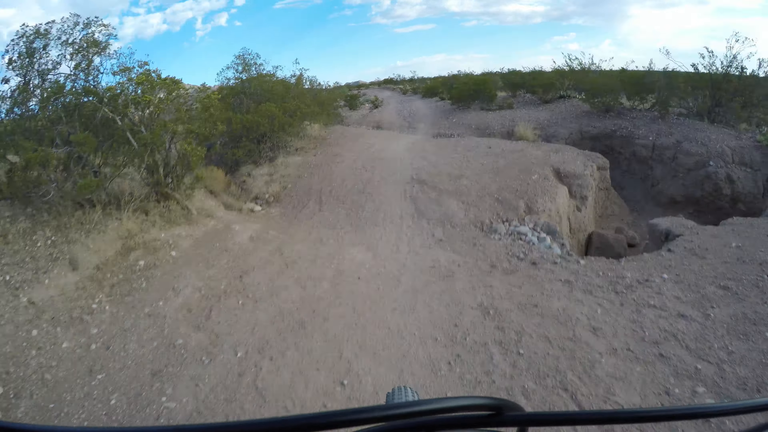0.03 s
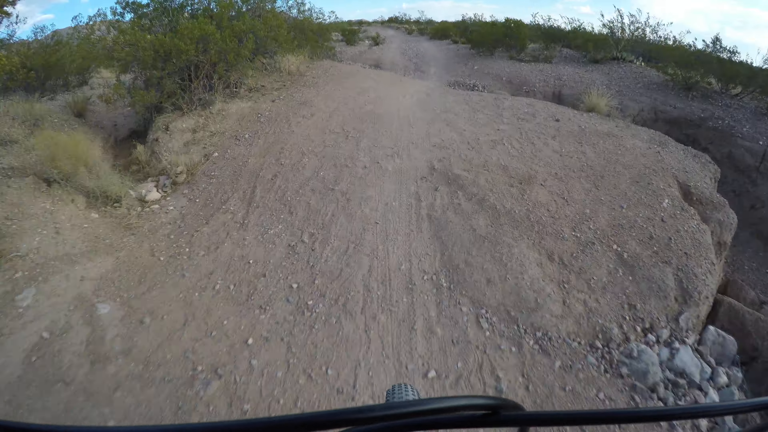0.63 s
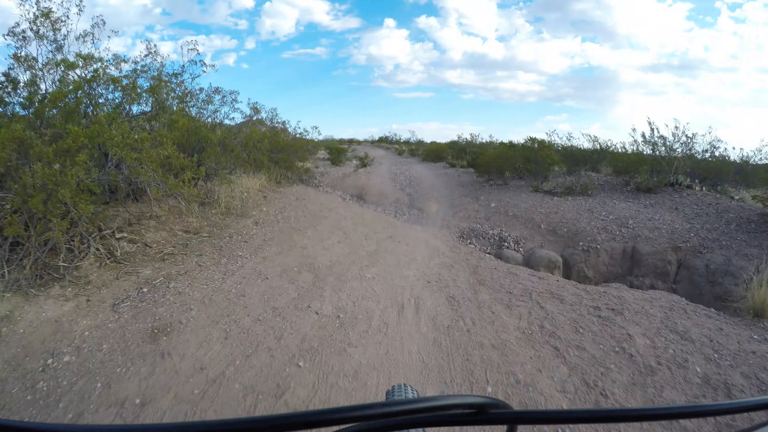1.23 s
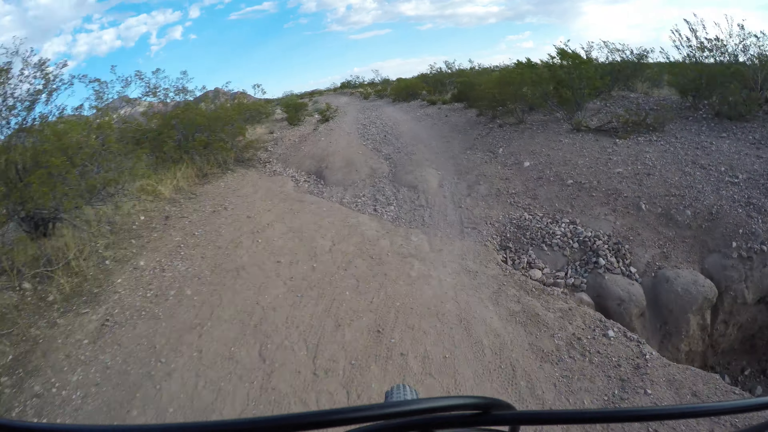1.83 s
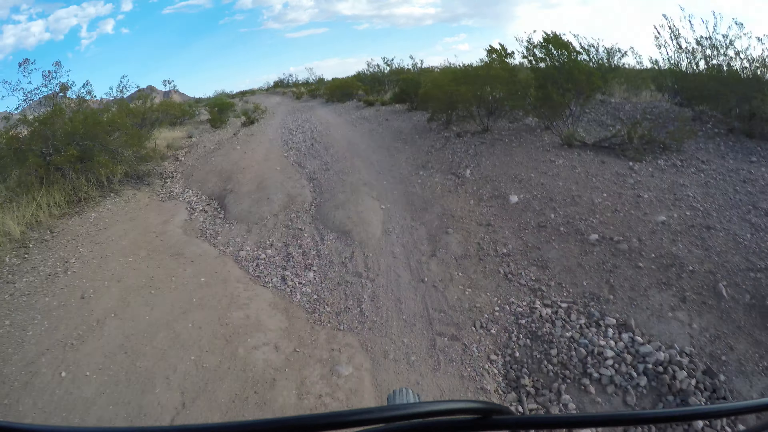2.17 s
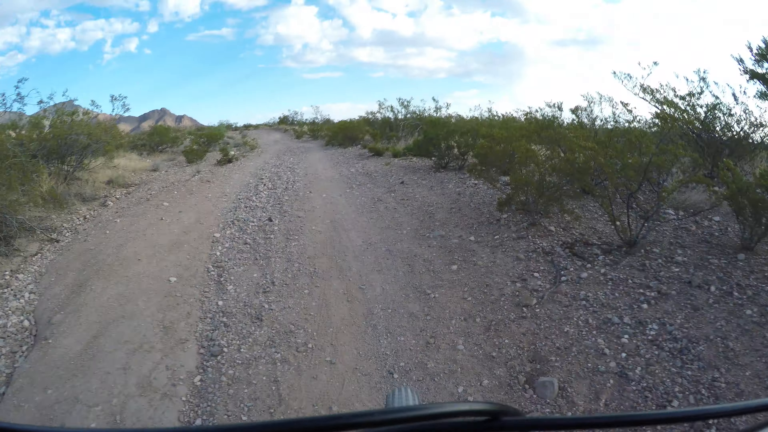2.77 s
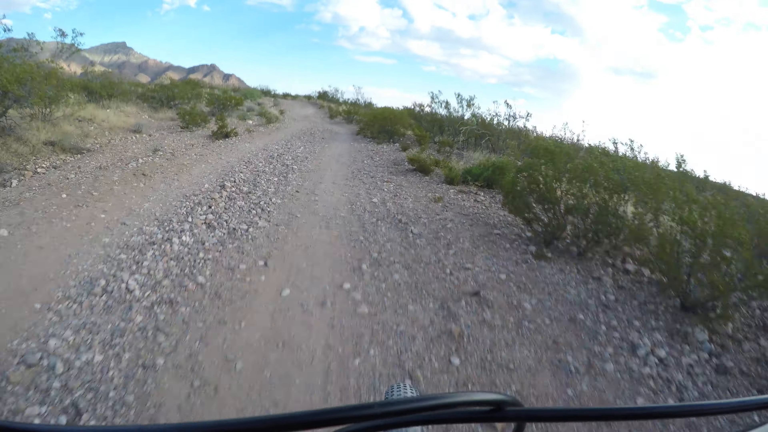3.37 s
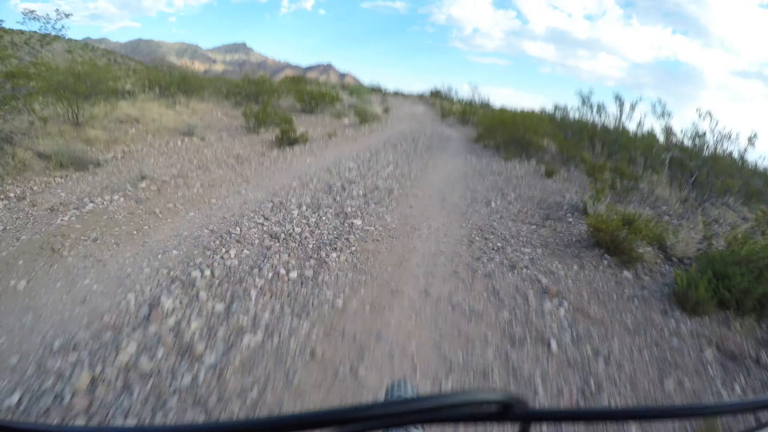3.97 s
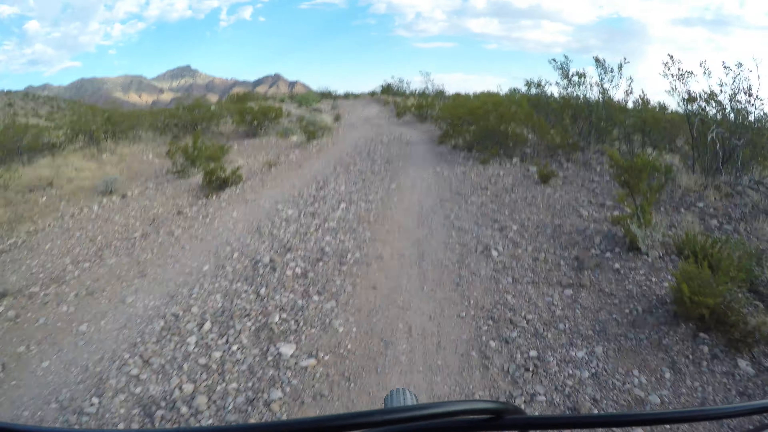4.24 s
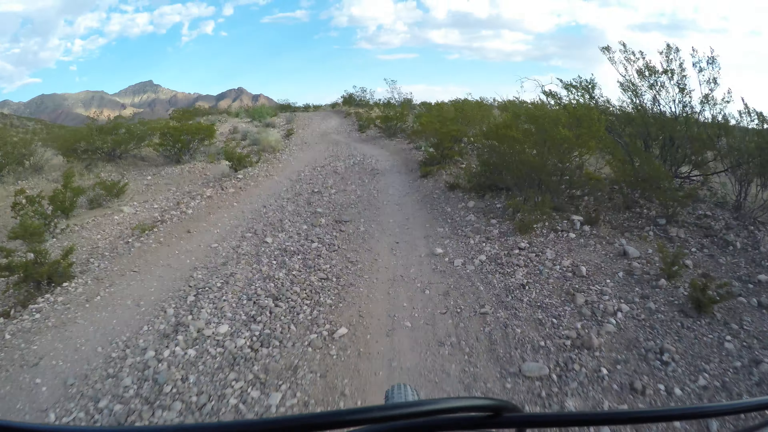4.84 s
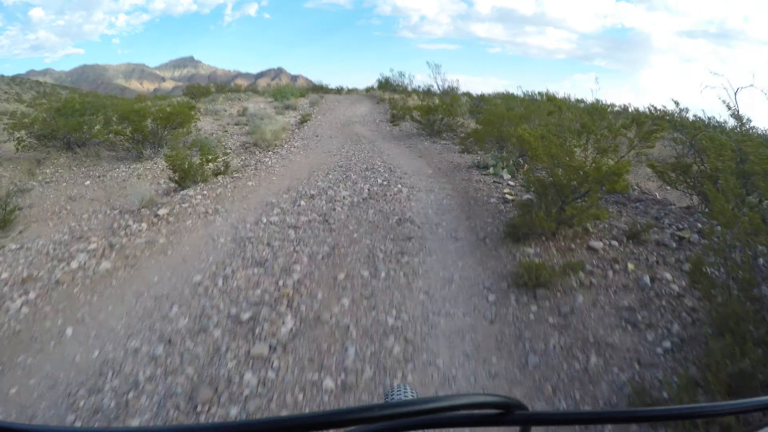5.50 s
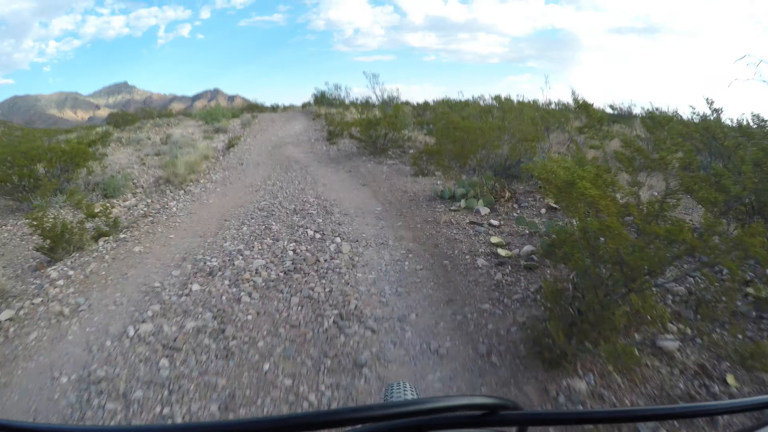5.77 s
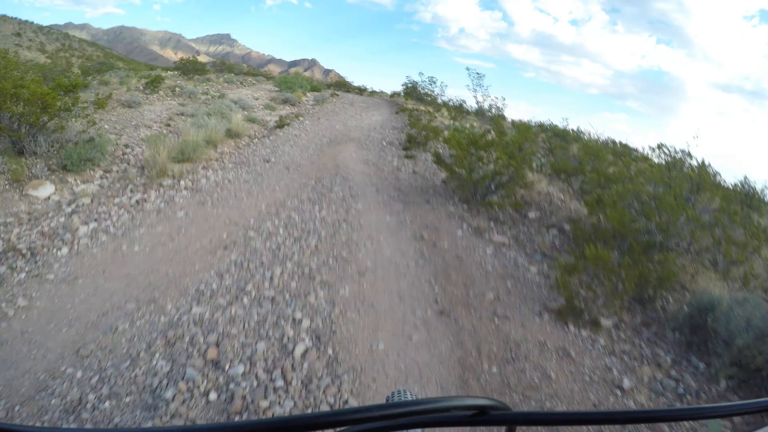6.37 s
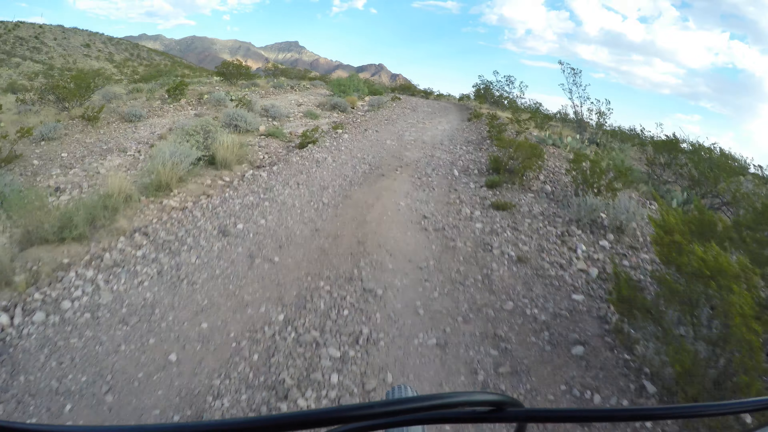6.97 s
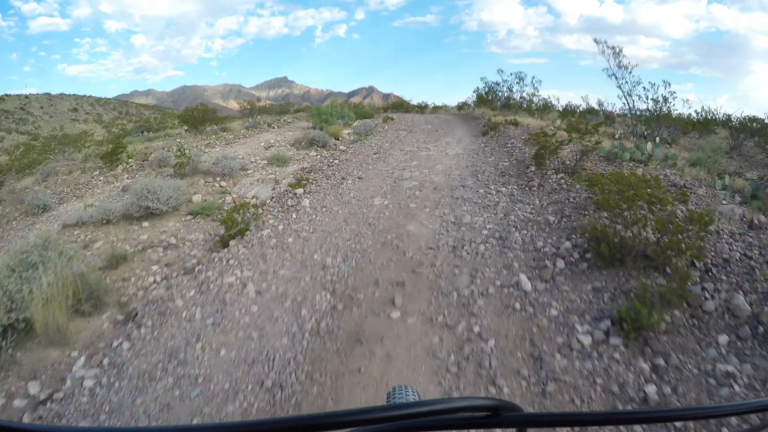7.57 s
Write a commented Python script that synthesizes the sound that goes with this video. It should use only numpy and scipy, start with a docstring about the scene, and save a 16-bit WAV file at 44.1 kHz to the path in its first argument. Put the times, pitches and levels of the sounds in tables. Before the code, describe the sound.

A mountain bike coasts over a stony trail with a deep, rattling shudder, thumping knocks and crunching gravel.

```python
"""A deep, rattling shudder: a mountain bike coasts down a stony trail, heard from the handlebar.
Bumps set a camera mount there swinging about 38 times a second. It ticks and rubs as it swings
and slams into its stop on the big hits, while cables tap the bar. The tyres drum through the frame
and crunch the gravel, a brake disc brushes its pads, and a few stones ping off metal."""
import sys
import numpy as np
from scipy import signal
from scipy.fft import rfft, irfft, next_fast_len
from scipy.io import wavfile

SR = 44100
rng = np.random.default_rng(int(sys.argv[2]) if len(sys.argv) > 2 else 0)


def master_out(mix):
    """Clip the mix to full scale and print it as 16-bit PCM to the path in sys.argv[1]."""
    frames = np.transpose(np.atleast_2d(mix))
    ceiling = np.clip(frames, -1, 1)
    pcm = np.round(ceiling * 32767).astype(np.int16)
    wavfile.write(sys.argv[1], SR, pcm)


N = 336483
JOSTLES_PER_S = 20   # small random jolts that never let the mount rest

# Blows on the mount and fork: start_s, thump_db, clack_db
KNOCKS = [(0.136, -13, -21.5), (0.326, -10.5, -24.5), (0.6196, -7, -21.5), (0.7166, -14, -27),
          (0.7814, -9, -22), (0.989, -16.5, -29), (1.0292, -10.5, -27.5), (1.092, -21, -42),
          (1.195, -11, -21.5), (1.228, -11.5, -28), (1.283, -16.5, -33), (1.539, -19, -40),
          (1.745, -17, -33.5), (1.8552, -15, -30), (2.039, -18.5, -37), (2.104, -9.5, -23),
          (2.1439, -9.5, -26.5), (2.199, -14, -28), (2.2558, -11.5, -19.5), (2.336, -5.5, -13.5),
          (2.433, -14.5, -33), (2.5697, -10.5, -23.5), (2.657, -11.5, -19.5), (2.686, -7, -22),
          (2.768, -6, -12), (2.793, -14, -27), (2.856, -2.5, -14), (2.884, -9.5, -14), (2.922, -13, -27),
          (3.19, -16.5, -30), (3.2441, -10.5, -24), (3.454, -19.5, -30), (3.5222, -12, -24),
          (3.6622, 1, -3.5), (3.7199, -6.5, -11), (3.7512, -6.5, -14.5), (3.777, -6, -16), (3.909, -8, -17),
          (3.926, -1.5, -4.5), (4.0079, -4.5, -12), (4.0413, -4.5, -9), (4.0705, -2, -6),
          (4.0995, -3.5, -8.5), (4.1311, -4, -6.5), (4.159, -8.5, -11.5), (4.214, -19.5, -28),
          (4.66, -19, -26), (4.7009, -3, -11), (4.7309, -5, -11), (4.756, -9, -22.5), (4.783, -19, -28.5),
          (5.5163, -10.5, -23), (5.7103, -18, -16), (5.726, -10, -21), (5.8126, -3, -10.5),
          (5.842, -14, -25), (6.033, -19, -39), (6.0925, -15, -21.5), (6.116, -11.5, -31),
          (6.1578, -11.5, -22.5), (6.2759, -11, -23), (6.3321, -7, -14), (6.359, -3, -14),
          (6.3856, 0.5, -3), (6.522, -12.5, -26), (6.6008, -15, -26), (6.761, -20, -37), (6.795, -19, -34),
          (6.938, -17, -41), (7.139, -11, -23.5), (7.173, -9.5, -21), (7.2, -15.5, -30),
          (7.3485, -7.5, -16), (7.375, -12, -21), (7.558, -23, -34), (7.587, -16, -26)]
# A mode is a tone that a struck thing rings at. The bike frame: pitch_hz, width_hz, level_db
FRAME_MODES = [(113, 81, -11), (154, 32, -40.5), (198, 62, -5), (241.2, 31.6, 4.5), (277, 51, -4),
               (400, 130, -56)]
# Tones of cables and loose parts: pitch_hz, width_hz, level_db
LOOSE_PART_MODES = [(560, 130, -6), (790, 170, 1), (990, 170, -1), (1240, 160, -5), (1470, 160, -5),
                    (2250, 350, -15), (2750, 300, -19), (3600, 600, -22)]
# Tones of clacking stones: pitch_hz, width_hz, level_db
STONE_MODES = [(760, 410, 0), (1260, 430, 3.5), (1451, 353, 0.5), (2250, 240, -12.5), (3060, 910, -15.5)]


def swing_width(attack_s=0.049, release_s=0.046, jostle_db=-26, stall_db=-9, stall_half_s=0.012):
    """How wide the mount swings: it builds on each rough patch, holds, then dies down."""
    # Rough patches of trail: start_s, length_s, swing_db
    bumps = [(0.007, 0.12, -14.5), (0.217, 0.043, -12), (0.359, 0.15, -16.5), (0.527, 0.32, -11.5),
             (0.878, 0.16, -13), (1.194, 0.086, -10.5), (1.581, 0.19, -16.5), (1.877, .14, -13.5),
             (2.131, .02, -10), (2.257, 0.089, -9), (2.42, 0.1, -13.5), (2.598, .03, -19),
             (2.657, 0.096, -9.5), (2.84, .25, -13.5), (3.142, 0.063, -15.5), (3.216, .30, -13.5),
             (3.595, 0.17, -10), (3.909, 0.017, -10.5), (4.03, .17, -9), (4.299, 0.024, -17),
             (4.459, 0.023, -12.5), (4.574, .06, -16), (4.667, 0.096, -9), (4.828, 0.17, -17),
             (5.016, 0.32, -16.5), (5.476, .11, -10), (5.777, 0.043, -8), (5.961, 0.19, -14),
             (6.249, .15, -8.5), (6.457, .19, -14.5), (6.765, 0.2, -19.5), (6.996, 0.081, -14.5),
             (7.165, 0.026, -8.5), (7.311, 0.06, -10), (7.488, 0.096, -13.5)]
    # Jolts against the swing that stall it for a moment: time_s
    stalls = [0.164, 0.703, 0.861, 0.952, 1.011, 1.138, 1.81, 2.11, 2.201, 2.571, 3.169, 3.55, 5.426, 5.697,
              5.909, 6.161, 7.42]
    t, width = np.arange(N) / SR, np.zeros(N)
    for s, length_s, db in bumps:
        attack = np.clip(1 + (t - s) / attack_s, 0, 1)
        release = np.exp(-np.maximum(t - s - length_s, 0) / release_s)
        width = np.maximum(width, from_db(db) * attack * release)
    in_step, out_of_step = (from_db(jostle_db) * drift(JOSTLES_PER_S) for _ in range(2))
    dip_db = stall_db * sum(hump(s, stall_half_s) for s in stalls)
    return np.hypot(width + in_step / 2, out_of_step) * from_db(wheel_load_db() + dip_db)


def swing_turns(swing, natural_hz=40.8, sag_hz=10, wander_hz=1.0):
    """A running count of the mount's swings: slower when wide, and in step with the knocks."""
    turns = np.cumsum(natural_hz - sag_hz * swing + wander_hz * drift(JOSTLES_PER_S)) / SR
    knock_s = np.sort([s for s, _, _ in KNOCKS])
    # Each knock lands 2/9 of a swing after the crest.
    shift = np.unwrap(2 / 9 - turns[(knock_s * SR).astype(int)], period=1)
    return turns + np.interp(np.arange(N) / SR, knock_s, shift)


def mount_shudder(swing, turns, swing_db, overtone_db, buffet_db, stop_db):
    """The deep shudder: wide swings meet the stop and grow lopsided, and air buffets the case."""
    # Rumble of air on the case: pitch_hz, level_db
    buffet_spectrum = [(16, 21), (28, 19.5), (52, 29.5), (75, 16.5), (130, -8), (300, -54)]
    angle = 2 * np.pi * turns
    travel = swing / (1 + (swing / from_db(stop_db)) ** 4) ** (1 / 4)
    shudder = np.sqrt(2) * travel * from_db(swing_db) * np.cos(angle)
    lopsided = -from_db(overtone_db) * swing ** 3 * np.cos(2 * angle)
    air = rms_one(coloured(rng.standard_normal(N), buffet_spectrum))
    return shudder + lopsided + from_db(buffet_db) * np.cbrt(swing) * air


def mount_ticks(swing, turns, tick_db, growth, slip_s, spurt_db=2.6, spread_db=2):
    """The joint slips with a tick once a swing, just after the crest, louder on wide swings."""
    # How the ticking rises and falls along the trail: time_s, gain_db
    ticking = [(0, -7), (.25, -4), (.5, -13), (.65, 0.5), (1.05, -9), (1.65, -14.5), (2.14, -11),
               (2.27, -1), (2.5, -1.5), (2.75, -1.5), (2.96, -7), (3.06, -1.5), (3.15, -10), (3.25, 4.5),
               (3.4, -3.5), (4.5, -7), (4.72, -8), (4.85, 4), (4.93, -11), (5.25, -3.5), (5.4, -8),
               (5.58, -3), (5.8, -5), (6.07, 1), (6.2, -3), (6.6, 1), (6.82, -15), (7.15, -1.5), (7.6, -1)]
    # Tones of the joint: pitch_hz, width_hz, level_db
    joint_modes = [(2300, 500, -3), (3900, 700, -6), (4500, 550, -2), (5100, 500, -3), (5680, 280, 2.5)]
    out, t = np.zeros(N), np.arange(SR // 60) / SR
    ticking_db = tick_db + in_time(ticking)[0] + spurt_db * drift(12)
    for at in np.flatnonzero(np.diff(np.floor(turns - 1 / 12)) > 0):
        level_db = ticking_db[at] + growth * 20 * np.log10(swing[at]) + spread_db * rng.normal()
        start_s = at / SR + 0.00075 * rng.normal()
        add(out, start_s, resonate(burst(t, slip_s), joint_modes), level_db)
    return signal.sosfilt(signal.butter(12, 6050, fs=SR, output="sos"), out)


def mount_rub(swing, turns, rub_db, growth):
    """Dusty plastic rubs on both strokes of the swing."""
    # Hiss of rubbing plastic: pitch_hz, level_db
    rub_spectrum = [(2500, -17), (4000, -7), (7000, -8), (9400, -2), (12000, -9), (15000, -13)]
    stroke = np.sin(2 * np.pi * (turns + 1 / 9)) ** 4
    friction = rms_one(coloured(grains(500, 2.8), rub_spectrum))
    return from_db(rub_db) * swing ** growth * (0.054 + stroke) * friction


def knocks(thump_gain_db, crack_gain_db, frame_db, chatter_db):
    """The mount touches its stop lightly, then slams home; the frame rings and loose parts chatter."""
    # Low tones of the thump: pitch_hz, width_hz, level_db
    thump_modes = [(173, 76, 0), (309.4, 55, 6), (372.6, 63, -2.5)]
    # Higher tones of the slam: pitch_hz, width_hz, level_db
    slam_modes = [(770, 170, 1), (960, 200, -4), (1250, 260, -9), (1500, 280, -5), (1950, 400, -15),
                  (2750, 500, -19), (3550, 800, -20)]
    # The sharp crack on top: pitch_hz, level_db
    crack_spectrum = [(1250, -2.5), (2500, -4.5), (4000, -3.5), (5000, -16), (5600, -0.5), (6500, -16.5),
                      (11000, -19.5), (15000, -28.5)]
    out, t = np.zeros(N), np.arange(SR // 10) / SR
    blow, lead_s, rise_s = signal.unit_impulse(len(t)), .004, .0002
    for s, thump_db, clack_db in KNOCKS:
        touch_s, slam_s = s - lead_s, s - rise_s
        add(out, touch_s, strike(blow, thump_modes, corner_hz=400, in_phase=True), thump_db - 23)
        add(out, touch_s, strike(burst(t, 0.0025), STONE_MODES, corner_hz=2350), clack_db - 13)
        thump = strike(blow, thump_modes, corner_hz=610, in_phase=True)
        add(out, slam_s, thump, thump_db + thump_gain_db)
        bright_hz = 1520 * 2 ** (clack_db / 29)   # lighter knocks are duller
        add(out, slam_s, strike(blow, slam_modes, bright_hz, in_phase=True), clack_db + 1.5)
        add(out, s, strike(blow, FRAME_MODES, corner_hz=350), thump_db + frame_db)
        chatter = burst(t - lead_s, .007) + .16 * burst(t, .02)   # with a fainter, longer jangle
        add(out, touch_s, strike(chatter, LOOSE_PART_MODES, corner_hz=2010), clack_db + chatter_db)
        crack = burst(t, .0012) + burst(t - lead_s, .0016) + .06 * burst(t - lead_s, .012)
        add(out, touch_s, coloured(crack, crack_spectrum), 1.36 * clack_db + crack_gain_db)
    return out


def cable_rattle(swing, turns, rattle_db, growth, return_db):
    """Cables and levers tap the handlebar at both ends of a swing, hard only when it is wide."""
    out, t = np.zeros(N), np.arange(SR // 25) / SR
    for at in np.flatnonzero(np.diff(np.floor(2 * turns)) > 0):
        returning = np.floor(2 * turns[at + 1]) % 2
        level_db = rattle_db + growth * 20 * np.log10(swing[at])
        level_db += returning * return_db + 3 * rng.normal()
        start_s = at / SR + returning * .003 + 0.001 * rng.normal()
        add(out, start_s, strike(burst(t, 0.0014), LOOSE_PART_MODES, corner_hz=3400), level_db)
    return out


def tyres(swing, drum_gain_db, crunch_gain_db, patchy_db, pebble_db, crush_s):
    """Stones drum through the tyres into the frame, pebbles clack and grit crunches in clumps."""
    # Roughness of the ground: time_s, drum_db, crunch_db
    ground = [(0.0, -35.5, -44), (0.57, -35.5, -48.5), (0.76, -34.5, -44.5), (1.1, -28.5, -40.5),
              (1.27, -33, -47), (1.42, -35, -44.5), (1.72, -35.5, -51), (2.17, -29, -44.5),
              (2.51, -35.5, -45), (2.76, -31, -41.5), (2.97, -37.5, -47.5), (3.27, -35, -44),
              (3.53, -34, -46.5), (3.85, -28.5, -38), (4.06, -50, -38.5), (4.25, -29, -44.5),
              (4.42, -39.5, -51), (4.61, -34.5, -46), (5.01, -37, -48.5), (6.12, -31.5, -42.5),
              (6.23, -32, -43.5), (6.44, -33, -42.5), (6.69, -35, -47), (7.01, -38.5, -50),
              (7.31, -34, -44), (7.63, -36.5, -45.5)]
    drum_db, crunch_db = in_time(ground) + 0.49 * wheel_load_db()
    bump_db = 20 * np.log10((1 + swing / np.mean(swing)) / 2)   # bumps press the tyres harder
    drum_db += 0.98 * bump_db + drum_gain_db
    crunch_db += bump_db + crunch_gain_db
    pebbles = grains(100, 2.0)
    jolts = soften(pebbles + 0.29 * grains(1500, 0.75), corner_hz=430)
    drum = rms_one(resonate(jolts, FRAME_MODES))
    # Each pebble grinds for a moment, fading over crush_s.
    crushing = signal.lfilter([1], [1, -np.exp(-1 / (crush_s * SR))], np.abs(pebbles) + 1e-18)
    contacts = soften(crushing * grains(3000, 0.89), corner_hz=3020)
    clacks = rms_one(resonate(contacts, STONE_MODES))
    # Crunch of crushed grit: pitch_hz, level_db
    grit_spectrum = [(270, -8.5), (430, 8), (640, -11.5), (880, -6), (1100, -10), (1400, -6.5),
                     (1800, -23.5), (2300, -13.5), (4000, -25.5), (7000, -33.5), (15000, -43.5)]
    clumps = grains(3500, 3.2) * from_db(patchy_db * drift(110))
    grit = rms_one(coloured(clumps, grit_spectrum))
    return from_db(drum_db) * drum + from_db(crunch_db) * (grit + from_db(pebble_db) * clacks)


def wheel_load_db():
    """Weight on the wheels: full, except when they go light after a bump."""
    # Hops of the bike: middle_s, half_length_s, dip_db
    hops = [(1.337, 0.028, -7), (1.787, 0.032, -1.5), (3.862, 0.033, -2), (3.968, .02, -2.5),
            (4.263, 0.035, -17.5), (4.403, 0.023, 0), (4.545, 0.035, -6.5), (5.386, 0.032, -2.5),
            (5.9, 0.043, -4), (6.707, 0.035, -3.5), (7.275, 0.016, -7)]
    return sum(db * hump(s, half_s) for s, half_s, db in hops)


def squeezed_stones(gain_db, grind_s):
    """Larger stones are squeezed out from under the tyres, each in a short run of clacks."""
    # Stones under the tyres: start_s, level_db
    stones = [(0.598, -28.5), (0.82, -31), (0.89, -25), (2.271, -24), (2.302, -19), (2.601, -33),
              (2.621, -28), (2.658, -26), (2.682, -13), (2.71, -17.5), (2.722, -30), (2.883, -22),
              (2.908, -16), (3.269, -25), (3.596, -34), (3.648, -18), (3.69, -13), (3.714, -21),
              (3.744, -23), (3.768, -29), (3.988, -23), (4.179, -29), (4.32, -27), (4.925, -34),
              (5.513, -16), (5.565, -25), (5.796, -16), (6.081, -29), (6.143, -26), (6.229, -29),
              (6.269, -18), (6.301, -24), (6.459, -24), (6.49, -23), (6.514, -17), (7.023, -31.5),
              (7.154, -25), (7.165, -16), (7.37, -24)]
    out, t = np.zeros(N), np.arange(SR // 25) / SR
    for s, level_db in stones:
        contacts = burst(t, grind_s) * (0.06 + (rng.random(len(t)) < 1800 / SR))
        add(out, s, strike(contacts, STONE_MODES, corner_hz=3430), level_db + gain_db)
    return out


def hollow_knock(start_s, peak_db, pitch_hz, width_hz):
    """One blow sets a hollow part of the bike ringing briefly."""
    out = np.zeros(N)
    add(out, start_s, resonate(signal.unit_impulse(SR // 8), [(pitch_hz, width_hz, 0)]), peak_db)
    return out


def stone_pings(gain_db, snap_s):
    """Small stones snap against metal; the harder the contact, the brighter the ping."""
    # Flung stones: start_s, level_db, brightness_hz
    pings = [(1.2158, -22, 4200), (1.2482, -22, 14000), (1.258, -35, 5500), (2.855, -29, 9000),
             (3.659, -26, 12000), (3.814, -32, 9000), (3.9077, -31, 15000), (3.993, -35, 13020),
             (4.056, -33, 14000), (4.068, -30, 14000), (5.5036, -22, 12100), (6.107, -35, 7974),
             (6.371, -31, 14030), (6.4933, -36, 7000), (6.5891, -31.5, 13040), (7.177, -31, 6986)]
    # Tones of the metal: pitch_hz, width_hz, level_db
    metal_modes = [(3400, 1400, -3), (5640, 600, 2), (8800, 1100, -4), (10300, 900, -1), (12200, 1100, -8),
                   (14200, 1000, -9)]
    out, t = np.zeros(N), np.arange(SR // 20) / SR
    for s, level_db, bright_hz in pings:
        snap = soften(burst(t, snap_s), bright_hz)
        add(out, s, resonate(snap, metal_modes), level_db + gain_db)
    return out


def brake_disc(gain_db, flutter_db, wobble_db):
    """The dusty disc brushes its pads and rings faintly, louder when the wheel flexes."""
    # Light, steady brushing: time_s, level_db
    brushing = [(0.0, -58), (0.53, -58.5), (0.85, -55), (1.61, -57), (2.25, -51), (3.31, -60), (3.95, -67),
                (4.29, -69), (6.14, -56.5), (6.33, -62), (6.84, -62), (7.63, -59)]
    # Harder grazes: middle_s, half_length_s, level_db
    grazes = [(0.614, 0.017, -43), (0.8, .014, -53), (1.039, 0.018, -45), (1.216, 0.035, -42),
              (1.483, 0.025, -56), (1.573, 0.025, -54.5), (2.238, 0.0081, -54), (2.383, 0.011, -39),
              (2.672, .012, -54), (2.858, 0.018, -44), (3.882, 0.011, -42)]
    # Ring of the disc: pitch_hz, level_db
    disc_spectrum = [(1400, -7.5), (2200, -3), (2920, -4.5), (3150, 7), (3600, -2.5), (3850, -10.5),
                     (5000, -23), (5650, -5.5), (6200, -47.5), (10000, -46.5), (15000, -40.5)]
    pressure = from_db(in_time(brushing)[0] + gain_db + wobble_db * drift(7.5))
    pressure += sum(from_db(db) * hump(s, half_s) for s, half_s, db in grazes)
    friction = rng.standard_normal(N) * from_db(flutter_db * drift(70))
    return pressure * rms_one(coloured(friction, disc_spectrum))


def strike(force, modes, corner_hz, in_phase=False):
    """One blow, each a little different; tones that start together (in phase) give a hard spike."""
    return resonate(soften(force, corner_hz), modes, scatter_db=1.8, detune=.055, in_phase=in_phase)


def resonate(x, modes, scatter_db=0, detune=0, in_phase=False):
    """Ring a body's tones; where it is hit can scatter their strength and pitch."""
    out = np.zeros(len(x))
    for k, (hz, width_hz, db) in enumerate(modes):
        decay = np.exp(-np.pi * width_hz / SR)
        angle = 2 * np.pi * hz * np.exp(detune * rng.normal()) / SR
        sign = 1 if in_phase else (-1) ** k
        gain = sign * from_db(db + scatter_db * rng.normal()) * (1 - decay ** 2) / 2
        feedback = [1, -2 * decay * np.cos(angle), decay ** 2]
        out += gain * signal.lfilter([1, 0, -1], feedback, x + 1e-18)
    return out


def soften(x, corner_hz):
    """A soft contact carries little treble above corner_hz."""
    return signal.sosfilt(signal.butter(2, min(corner_hz, .45 * SR), fs=SR, output="sos"), x + 1e-18)


def coloured(x, spectrum):
    """Make each pitch in a sound louder or softer, following a spectrum."""
    hz, db = np.transpose(spectrum)
    size = next_fast_len(len(x))
    f = np.maximum(np.fft.rfftfreq(size, 1 / SR), 1)
    gain = from_db(np.interp(np.log(f), np.log(hz), db)) * np.minimum(f / hz[0], 1) ** 2
    return irfft(rfft(x, size) * gain, size)[:len(x)]


def grains(per_s, spread_db):
    """Random clicks, mostly small and now and then large."""
    sizes = from_db(spread_db * np.minimum(rng.exponential(1, N), 4)) * rng.choice([-1, 1], N)
    return sizes * (rng.random(N) < per_s / SR)


def burst(t, fade_s):
    """Noise that starts at t = 0 and dies away."""
    return rng.standard_normal(len(t)) * (t >= 0) * np.exp(-np.abs(t) / fade_s)


def drift(per_s):
    """A random curve of typical size 1 that wanders about per_s times a second."""
    steps = rng.standard_normal(N // 20)
    return rms_one(np.interp(np.arange(N) / SR * per_s, np.arange(len(steps)), steps))


def hump(middle_s, half_s):
    """A smooth rise to 1 and back to 0."""
    return np.exp(-((np.arange(N) / SR - middle_s) / half_s) ** 2)


def in_time(rows):
    """Join a table's timed points with straight lines, one curve for each value column."""
    s, *columns = np.transpose(rows)
    return [np.interp(np.arange(N) / SR, s, c) for c in columns]


def add(out, s, sound, peak_db):
    """Mix a short sound in at time s with the given peak."""
    at = int(np.clip(round(s * SR), 0, N - 1))
    out[at:at + len(sound)] += (from_db(peak_db) * sound / np.max(np.abs(sound)))[:N - at]


def from_db(db):
    """Turn decibels into a number to multiply by."""
    return 10 ** (np.asarray(db) / 20)


def rms_one(x):
    """Scale a signal so its typical size (rms) is 1."""
    return x / np.sqrt(np.mean(x ** 2) + 1e-20)


def scene():
    """Everything as it reaches the handlebar, in one channel."""
    swing = swing_width()
    turns = swing_turns(swing)
    mix = mount_shudder(swing, turns, swing_db=2.0, overtone_db=9.0, buffet_db=-18.5, stop_db=-12)
    # The larger the growth, the faster a sound gets louder as the swing widens.
    mix += mount_ticks(swing, turns, tick_db=-19.5, growth=1.4, slip_s=.0008)
    mix += mount_rub(swing, turns, rub_db=-36, growth=2.52)
    mix += cable_rattle(swing, turns, rattle_db=-3.0, growth=3.69, return_db=5.0)
    mix += knocks(thump_gain_db=-5.5, crack_gain_db=-18.5, frame_db=-7.5, chatter_db=-14.5)
    mix += tyres(swing, drum_gain_db=4.5, crunch_gain_db=-1, patchy_db=2, pebble_db=-3, crush_s=0.0014)
    mix += squeezed_stones(gain_db=-5.5, grind_s=0.0055)
    mix += hollow_knock(start_s=1.193, peak_db=-21, pitch_hz=665, width_hz=55)
    mix += brake_disc(gain_db=-2.5, flutter_db=5.0, wobble_db=2.4)
    mix += stone_pings(gain_db=-3.0, snap_s=0.00096)
    return mix[None]


def record(dry):
    """The loudest peaks are rounded off and the highest treble is cut."""
    rounded = dry / (1 + np.abs(dry) ** 6) ** (1 / 6)
    return signal.sosfilt(signal.cheby2(16, 60, 16100, fs=SR, output="sos"), rounded)


dry = scene()
out = record(dry)
master_out(out)
```